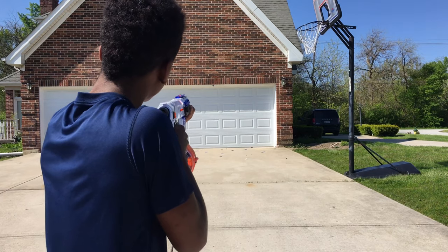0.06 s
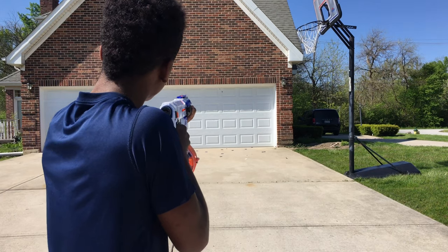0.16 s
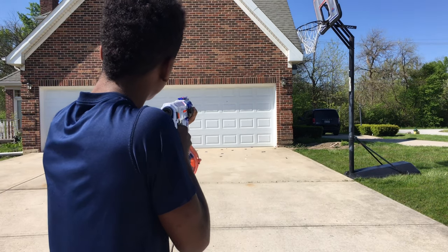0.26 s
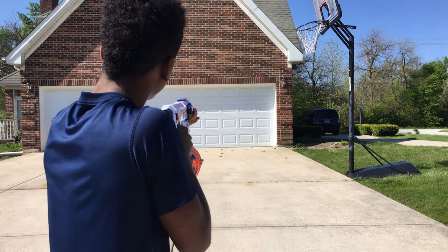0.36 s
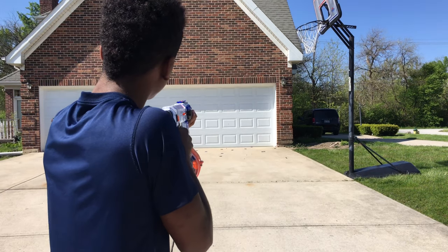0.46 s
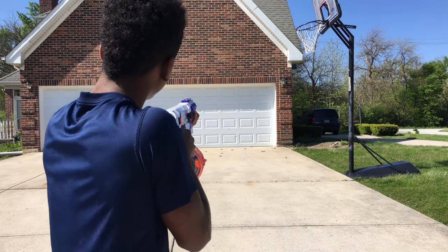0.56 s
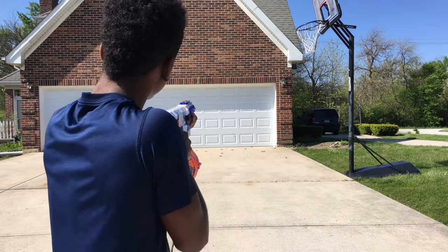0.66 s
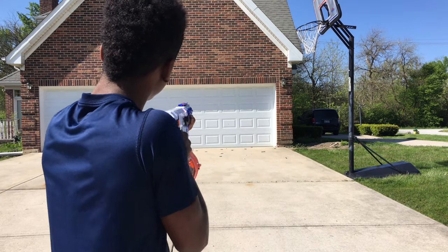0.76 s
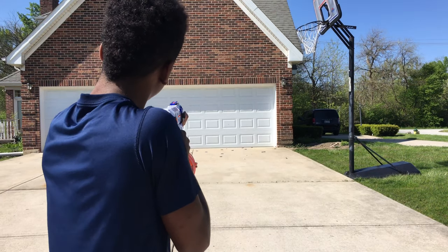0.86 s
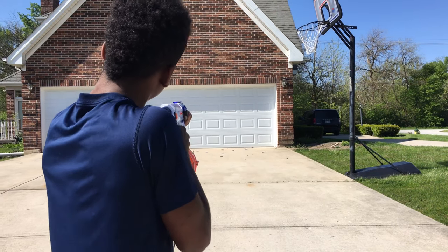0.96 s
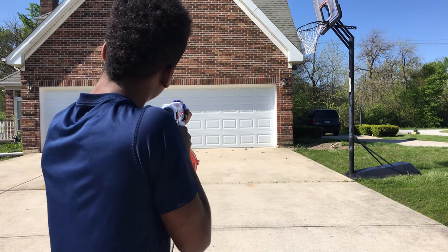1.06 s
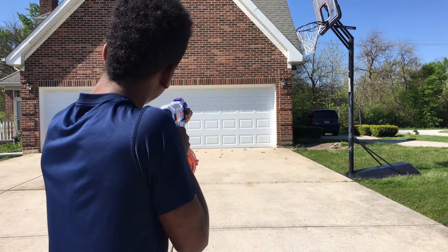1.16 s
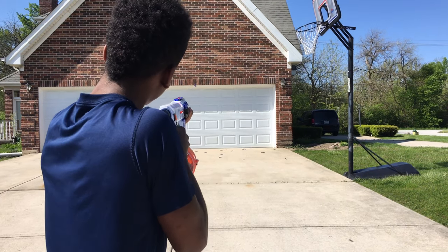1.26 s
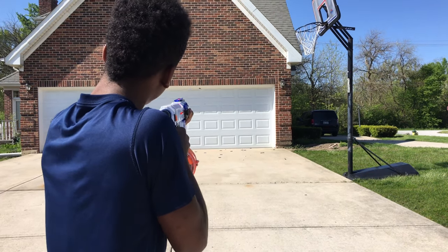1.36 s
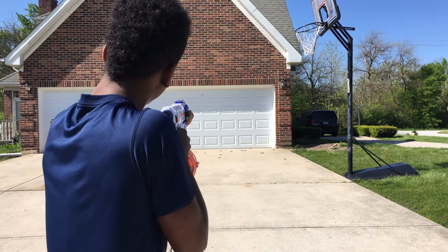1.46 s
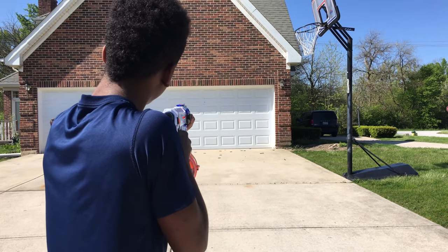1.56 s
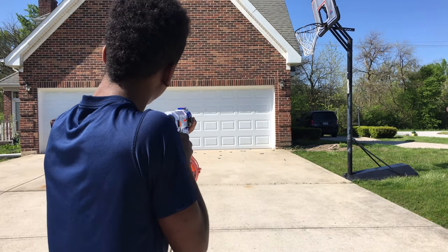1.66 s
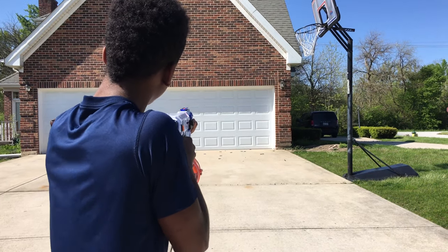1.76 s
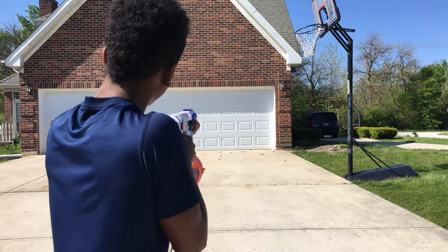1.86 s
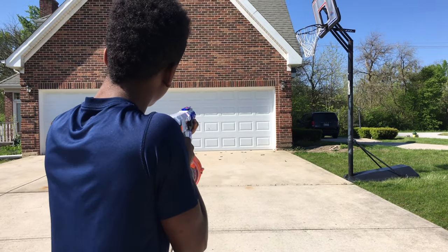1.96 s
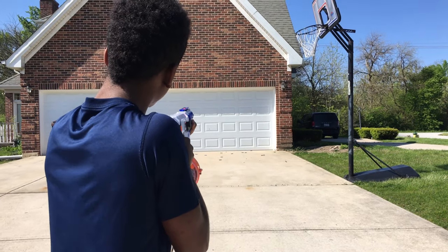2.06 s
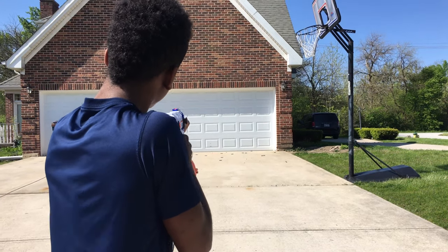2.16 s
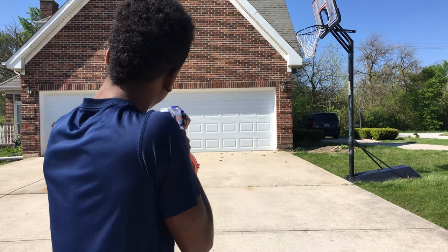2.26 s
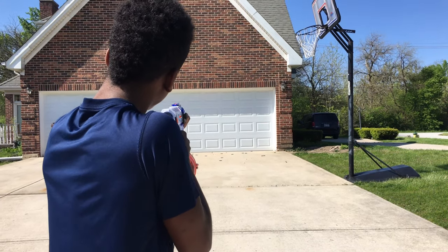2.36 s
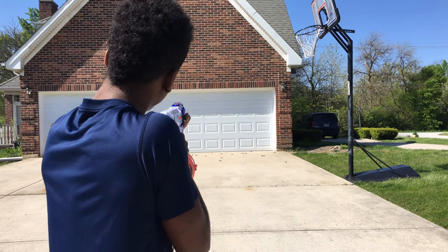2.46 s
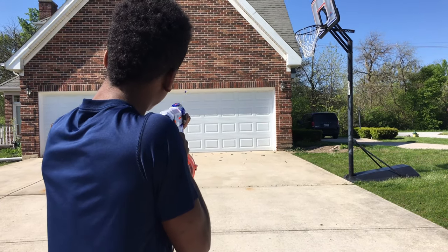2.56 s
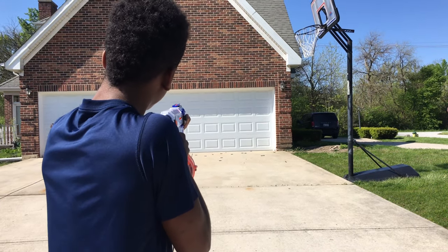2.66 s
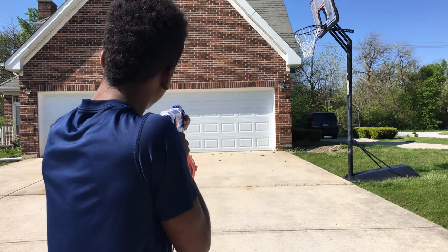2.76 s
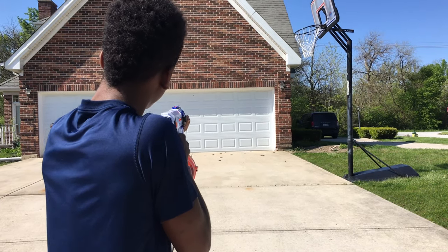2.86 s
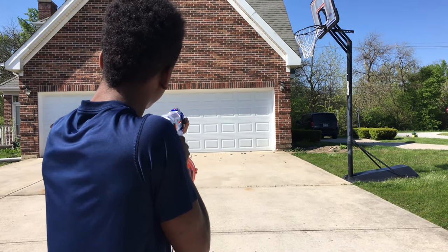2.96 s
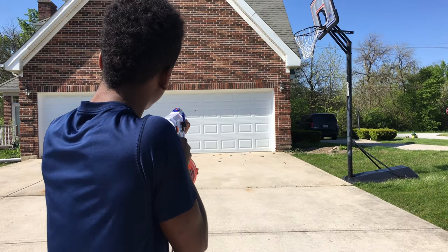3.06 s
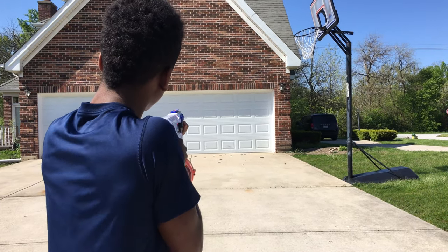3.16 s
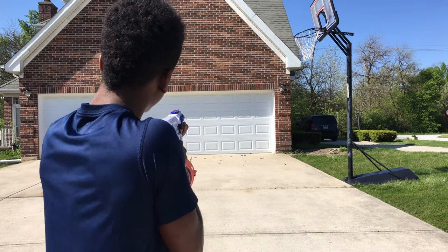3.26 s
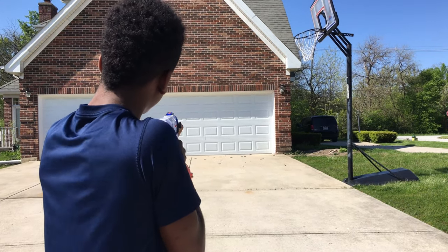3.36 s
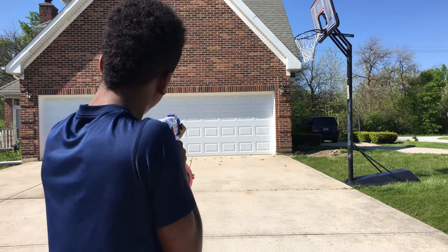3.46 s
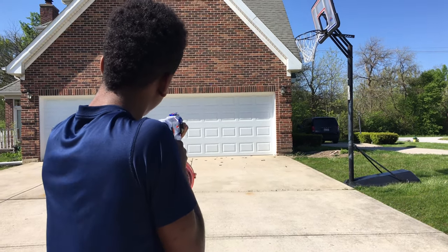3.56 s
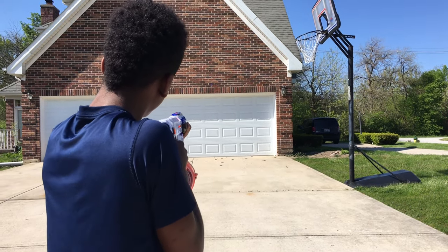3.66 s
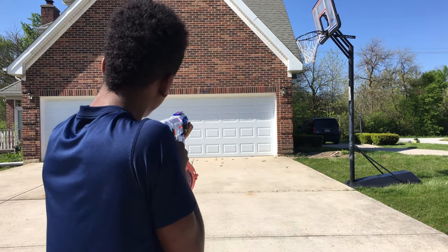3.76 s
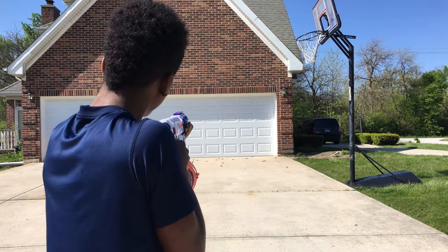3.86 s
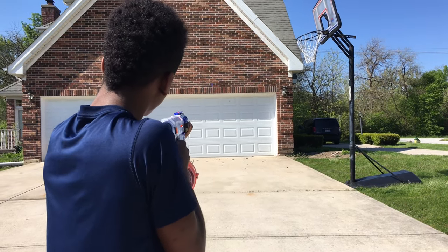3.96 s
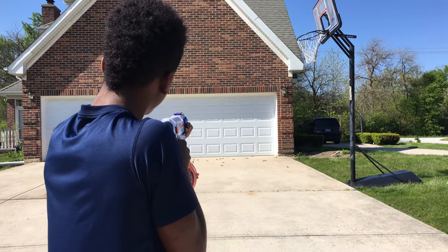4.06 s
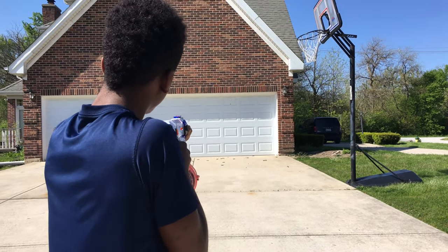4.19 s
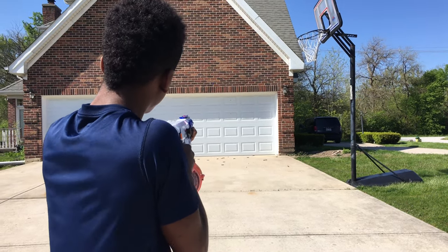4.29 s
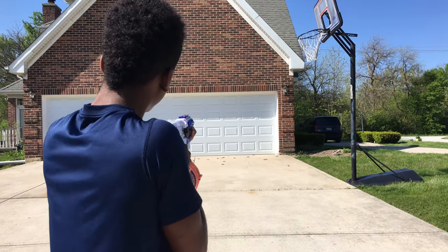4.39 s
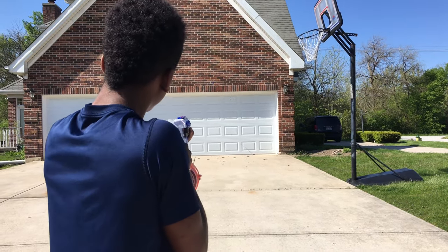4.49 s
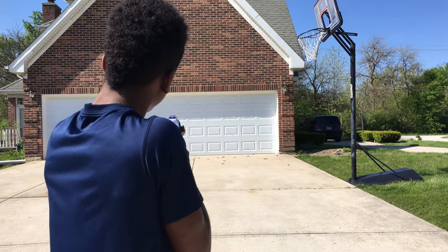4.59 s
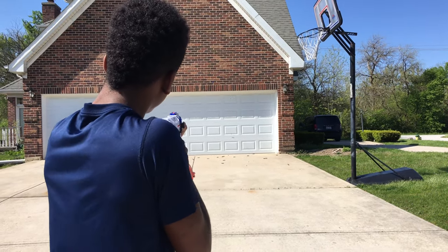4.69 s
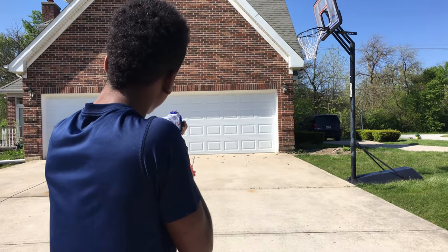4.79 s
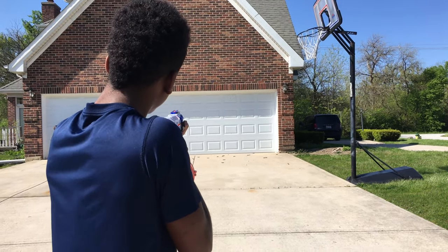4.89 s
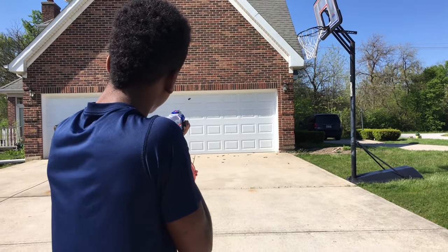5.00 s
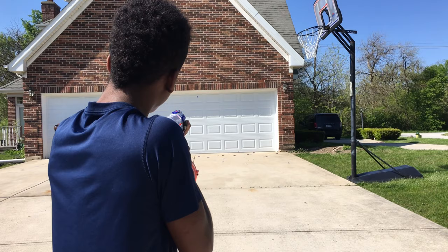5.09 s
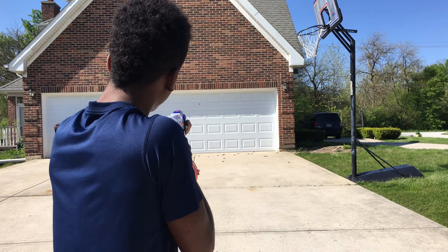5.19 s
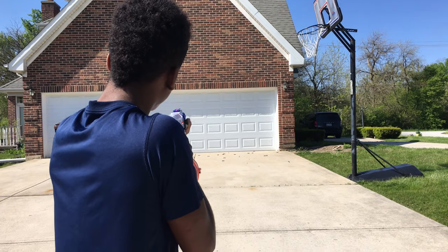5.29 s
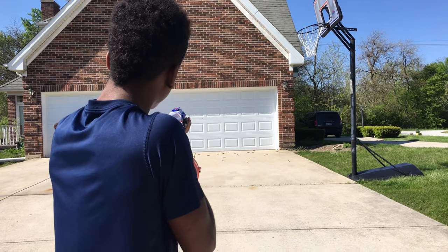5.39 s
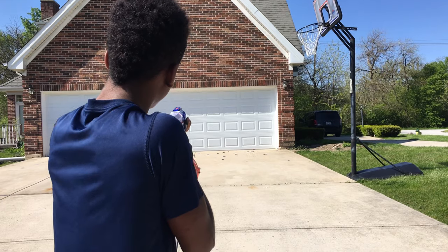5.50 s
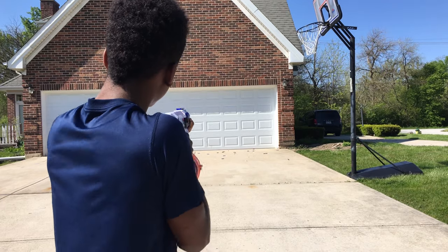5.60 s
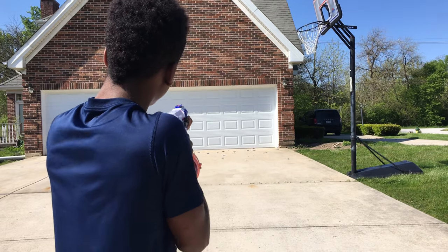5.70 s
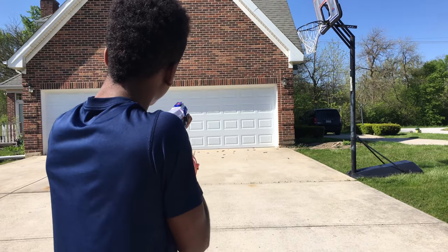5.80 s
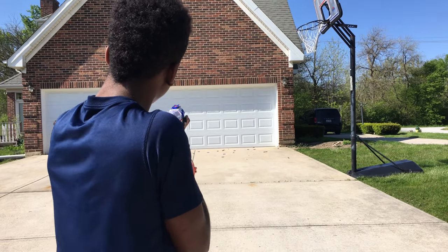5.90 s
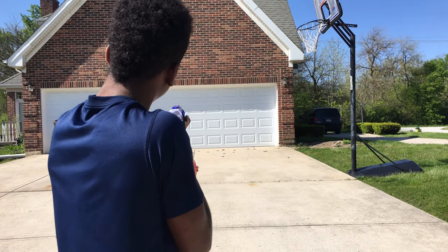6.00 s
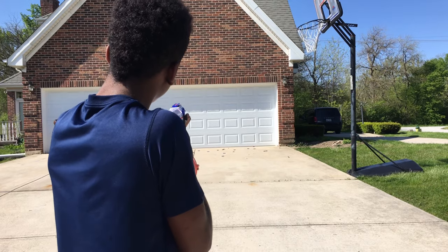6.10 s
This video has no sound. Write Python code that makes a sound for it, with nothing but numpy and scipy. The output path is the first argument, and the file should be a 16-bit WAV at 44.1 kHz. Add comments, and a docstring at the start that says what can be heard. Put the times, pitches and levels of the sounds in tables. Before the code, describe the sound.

A spring-powered plastic dart blaster is worked close to the microphone on an open driveway. The sound starts right on a shot at 0.0 seconds: a loud, dry piston slam with bright rebound and short hollow barrel pop. More shots follow near 1.26, 2.53, 3.79 and 5.0. After each, the grip scrapes and clacks back, at about 0.6, 1.85, 3.12, 4.35 and 5.6, with a latch, loose rattling and often a duller knock; it slams forward near 0.95, 2.23, 3.46, 4.69 and 5.94. A small trigger click comes just before each later shot. A faint garage slap returns about 0.07 seconds later. Soft foam darts tap down far off about 0.3 seconds after firing. A distant bird twitters faintly before 0.9. Low wind buffets in uneven puffs, strongest around 1.2 to 1.7, over a soft garden hush. It ends just after the final forward slam.

```python
"""Toy dart blaster on a driveway

A spring-powered toy dart blaster is pumped and fired just in front of the microphone. Each stroke layers
noise bursts through plastic resonances: grip rattling back and clacking home, trigger click, plunger slam.
Damped sines ring the barrel and stock; foam darts tap down far off as soft filtered bursts.
A garage front echoes it all; shaped noise makes the gusts and the garden hush, and fluttering sines a far bird.
"""
import sys
import numpy as np
from scipy import signal
from scipy.fft import rfft, irfft, next_fast_len
from scipy.io import wavfile
from scipy.ndimage import uniform_filter1d

SR = 44100
rng = np.random.default_rng(int(sys.argv[2]) if len(sys.argv) > 2 else 0)


def generate_wav(signal):
    """Clip the signal to [-1, 1] and save it as 16-bit WAV at the path in sys.argv[1]."""
    frames = np.transpose(np.atleast_2d(signal))
    scaled = np.clip(frames, -1, 1) * 32767
    pcm = np.round(scaled).astype(np.int16)
    wavfile.write(sys.argv[1], SR, pcm)


N = 270774

# Plunger releases: (time [s], mechanism trim [dB], muzzle pop trim [dB])
SHOTS = [(-.0125, -2, -1.5), (1.260, .5, 1), (2.532, 0.5, 0.5), (3.7872, -1, 3.5), (5.0053, 1, 0)]
# Air column of barrel and cylinder: (frequency [Hz], level [dB], t60 [s])
BARREL_MODES = [(148, -18.5, 0.024), (226, -21, 0.03), (368.3, -4, 0.038), (582, -3, 0.042),
                (790, -9, 0.045), (980, -6.5, 0.051), (1310, -12, 0.066), (1764, -13, 0.019)]
# Hollow stock: (frequency [Hz], level [dB], t60 [s])
STOCK_MODES = [(229, 1.5, 0.074), (423, -1, 0.078), (989, -3.5, 0.062), (1556, 4, 0.068)]

# Broad colours, scaled to unit power when used: (frequency [Hz], relative level per Hz [dB])
# of the plastic shell, piston slam, piston rebound, air behind the dart, trigger catch and dart taps
SHELL_COLOUR = [(120, -29), (200, -10), (394, -10), (519, -6), (986, -0.5), (1450, 2), (1740, -1.3),
                (2470, -3.3), (2960, -3), (3430, -4), (5420, -10), (9400, -14.5), (10500, -18),
                (11900, -16), (16000, -25.5)]
SLAM_COLOUR = [(150, -9.5), (400, 7), (900, 4), (1400, 1), (2000, -0.5), (2850, -3), (3400, -4.5),
               (4400, -0.5), (4950, -3.5), (5500, -4), (7500, -8.5), (10300, -12.5), (12300, -12.5),
               (16000, -38.5)]
REBOUND_COLOUR = [(200, -5), (800, 2), (2500, -9), (5500, -3), (9000, -2.5), (13000, -1), (16000, -11)]
AIR_COLOUR = [(50, -31.5), (150, -7.5), (400, -3), (900, -1.5), (1300, -5.5), (2200, -24.5), (6000, -34.5)]
CATCH_COLOUR = [(200, -21.5), (550, -12), (800, -2), (1700, -2), (3500, -5), (5000, -8.5), (8500, -11),
                (10400, -17.5), (12000, -14.5), (16000, -23)]
DART_COLOUR = [(200, -66), (500, 2), (900, 8), (1500, 0.5), (3000, -3.5), (6000, -15), (10000, -29),
               (16000, -29)]
# of the quiet garden, the wind, and the tail scattered by trees, in the same columns
GARDEN_COLOUR = [(15, -33), (25, -6), (64, 5.5), (127, -5), (270, -14.5), (384, -11.5), (503, -16.5),
                 (840, -15), (1020, -15.5), (1700, -20.5), (3620, -26), (7710, -35.5), (11900, -38.5),
                 (14800, -41.5), (16000, -54.5)]
WIND_COLOUR = [(15, -39), (25, -9), (70, 0), (179, -4.5), (279, -11.5), (325, -17), (395, -22),
               (700, -30.5), (910, -70.5), (1540, -120)]
TREE_COLOUR = [(150, -4.5), (500, -4.5), (1100, 11.5), (3500, -12.5), (7000, 6.5), (16000, -15.5)]

# Resonances of shell, cylinder and catch: (frequency [Hz], width [Hz], boost [dB])
SHELL_MODES = [(379, 56, 7.5), (489, 35, -10), (815, 60, 3.5), (985, 110, 3.2), (1067, 21, -6),
               (1303, 75, 2), (1408, 260, -0.5), (1526, 65, 1.5), (2080, 120, 4), (2400, 35, 7),
               (2940, 330, -7), (3400, 490, 3), (4051, 450, 2.7), (4480, 210, 3), (5550, 110, 2),
               (5420, 480, 4), (5980, 400, 0.8), (6200, 540, 3.5), (6790, 470, 3.5), (7300, 400, -1),
               (8300, 260, 3), (9500, 290, 3), (10200, 260, -2), (11450, 220, 2.5)]
CYLINDER_MODES = [(1445, 87, -10), (1824, 47, 4), (2906, 440, -7.5), (3110, 77, 5.5), (3390, 790, 9.5),
                  (3670, 110, 1.5), (4135, 440, 1), (5000, 240, -6.5), (5400, 400, 6.5), (5941, 540, 3.5),
                  (6160, 190, 1), (6800, 400, 3), (8000, 90, 0), (8400, 250, 2.5), (10433, 470, -8),
                  (11100, 240, 0)]
CATCH_MODES = [(766, 58, 5.7), (1015, 63, 6.3), (2067, 200, 9.9), (2550, 72, 8), (3459, 400, 5.6),
               (4100, 260, 10), (4560, 90, 6.9), (6170, 280, 8), (7300, 320, 5.5), (8645, 400, 6)]

# Strength of the breeze, before the breeze gain: (time [s], level [dB])
GUSTS = [(0.0, -47), (0.2, -46), (1.04, -39), (1.39, -27), (1.52, -27), (1.76, -40), (1.98, -43.5),
         (2.21, -40.5), (2.74, -46), (3.15, -40), (3.47, -48), (4.14, -49), (4.5, -49), (4.84, -37.5),
         (5.06, -44), (5.52, -42), (5.66, -47), (6.14, -52)]
# Strongest eddies hitting the microphone: (time [s], level [dB])
PUFFS = [(.68, -27), (.733, -21), (1.022, -26), (1.185, -20), (1.323, -21), (1.615, -23), (1.71, -27),
         (2.364, -25), (2.881, -25), (3.02, -28.5), (3.074, -28), (3.253, -29), (4.593, -25),
         (4.843, -21.5), (4.877, -21), (5.255, -30), (5.511, -32)]
# Far songbird's twittering phrases: (start [s], end [s], reference pitch [Hz], level [dB])
PHRASES = [(.09, 0.426, 5300, -56), (.44, .57, 4950, -58), (.72, .86, 5100, -58.5)]
# Bird's two voices: (share of the reference pitch, level trim [dB])
VOICES = [(0.97, 1.5), (.55, -1.5)]
# Hollow echoes from the ribbed garage door: (delay [s], level [dB])
DOOR_ECHOES = [(0.0748, -15.5), (0.1, -26.5)]

# Darts landing far off: (time [s], level before the common trim [dB])
DARTS = [(.243, -19.5), (1.551, -22), (2.8, -20), (4.073, -23), (5.323, -27.5)]
# Each dart grazes, hits, tumbles and taps again: (time from the hit [s], level trim [dB])
DART_TAPS = [(-.012, -2), (0, 0), (.028, -9.5), (.046, 0)]
# Single light taps around the dart landings: (time [s], level before the common trim [dB])
SINGLE_TAPS = [(.388, -29), (4.0, -30), (5.219, -29), (5.273, -30.5)]

# Grip pulled back, timed at its sharpest crack:
# (time [s], trim [dB], duration as a share of the usual, spring latching level [dB])
PULLS = [(0.597, .7, 1.0, -11.5), (1.8491, .3, 1.03, -14), (3.1239, -.7, 1.1, -10.5), (4.3501, .3, .96, -7),
         (5.5982, -.7, .98, -11.5)]
# Pull contacts: grip taken up, two catches, the crack, a rail joint, the spring's catch:
# (time from the crack [s], level [dB], treble trim [dB])
PULL_CONTACTS = [(-.034, -37, 0.5), (-.0135, -22.5, 8), (-.0058, -17, 9.5), (0, -17.5, 18),
                 (.021, -21.5, 13.5), (.033, -16, 11.5)]
# Grip sliding back: (start from the crack [s], end [s], start level [dB], end level [dB])
PULL_SLIDE = (-.021, .046, -21, -17.5)
# Grip knocking its rear stop: (time [s], level [dB], treble trim [dB])
REAR_KNOCKS = [(.678, -9.5, -10), (1.9094, -14.5, -20), (1.9394, -12, 2.5), (3.1824, -6.5, -24),
               (5.6894, -8, -22)]
# Each knock and its duller rebound: (time after the knock [s], level trim [dB], treble trim [dB])
KNOCK_CONTACTS = [(0, 0, 0), (.009, -7.5, -11.5)]
# Grip slammed home: (time [s], trim [dB], duration as a share of the usual, jolt of the stock [dB])
PUSHES = [(.9454, .5, 1.07, -22.5), (2.2303, 0, .94, -23.5), (3.4616, -.3, 1.06, -23.5),
          (4.6868, .3, .96, -18), (5.937, 1, 1.0, -19)]
# Push contacts: grip taken up, dart picked up, two catches, breech shutting twice, rebound:
# (time from the slam [s], level [dB], treble trim [dB])
PUSH_CONTACTS = [(-.067, -31, 1), (-.037, -17, -14.5), (-.0135, -21.5, 5), (-.0075, -17, 7.5),
                 (0, -8.8, 6.5), (.003, -16, 10), (.027, -17.5, -18)]
# Grip sliding forward: (start from the slam [s], end [s], start level [dB], end level [dB])
PUSH_SLIDE = (-0.06, -0.0031, -30, -19.5)
# Trigger pulls: (time of the snap [s], snap level [dB], level of the slack taken up [dB])
TRIGGERS = [(1.2225, -12, -16), (2.491, -13.5, -16), (3.7528, -12, -21), (4.9695, -14, -24)]

LATCH_AFTER_S, LATCH_TREBLE_DB = .0395, 2   # crack to latch at the usual pull duration
JOLT_LEAD_S = .0015   # the stock is jolted just before the breech shuts
RATTLE_DB, RATTLE_TREBLE_DB, RATTLE_FALL_DB_PER_S = -22, -20, 150
RATTLE_GAP_S = .015   # mean gap between bounces of loose parts
DRAG_DB, DRAG_HZ = 2.5, 500   # hollow drag of the forward slide, and its lowpass
SLACK_LEAD_S, SLACK_TREBLE_DB, SNAP_TREBLE_DB = .011, -11.5, 5.5
BREEZE_DB, CALM_DB = 5, -46.5   # buffeting gain; gusts below the calm level add no buffeting
GARDEN_DB = -46   # before the gains inside and outside the dull spans
DULL_FROM_S, DULL_S = 0.426, 0.14   # spans of quieter, duller background: start counted from a shot, length
SLURS_PER_S, SLUR_DEPTH = 24, .022   # depth as a share of the pitch
CUTOFF_HZ = 16100

SIZE = next_fast_len(N + SR)   # spare second for tails and for sound begun before time zero
HZ = np.maximum(np.arange(SIZE // 2 + 1) * SR / SIZE, 1)
TIME = np.arange(SIZE) / SR
AGE = np.arange(SR // 4) / SR   # seconds since the start of one short sound


def from_db(db):
    """Turns decibels into amplitude gain."""
    return 10 ** (np.asarray(db) / 20)


def fade(t, t60):
    """Dies by 60 dB in t60 seconds; silent before time zero."""
    return (t >= 0) * np.exp(-np.log(1000) * np.maximum(t, 0) / t60)


def add(track, s, sound):
    """Mixes a sound in at s seconds; the track wraps round at its ends."""
    track[(round(s * SR) + np.arange(len(sound))) % SIZE] += sound


def lowpass(x, hz, order=2):
    """Butterworth rolloff of the treble."""
    sos = signal.butter(order, min(hz, .45 * SR), fs=SR, output="sos")
    return signal.sosfilt(sos, x + 1e-18)


def colour(x, spectrum, modes=()):
    """Causal (minimum-phase) filter of unit power: a broad spectrum with resonances on top."""
    hz, db = np.transpose(spectrum)
    db = np.interp(np.log(HZ), np.log(hz), db)
    for centre, width, peak_db in modes:
        db = db + peak_db / (1 + (2 * (HZ - centre) / width) ** 2)
    gain = from_db(db)
    unit_gain = gain / np.sqrt(np.mean(gain ** 2))
    # folding the cepstrum onto positive time gives minimum phase
    cepstrum = irfft(np.log(unit_gain), SIZE)
    cepstrum[1:] *= 2 * (np.arange(1, SIZE) < SIZE // 2)
    return irfft(rfft(x, SIZE) * np.exp(rfft(cepstrum)), SIZE)


def drift(rate):
    """Random wander about zero with rate knots per second; spread about 1."""
    knots = rng.standard_normal(SR // 10)
    return np.interp(TIME * rate, np.arange(len(knots)), knots)


def chatter(spread_db, count=len(AGE)):
    """Dense tiny contacts of uneven size; rms 1."""
    noise = rng.standard_normal(count)
    sizes = np.repeat(rng.standard_normal(count // 16 + 1), 16)[:count]
    x = noise * from_db(abs(spread_db) * sizes)
    return x / x.std()


def ring(modes):
    """Damped sines pushed off together that swell up quickly; every stroke is tuned a little differently."""
    out = 0
    for hz, db, t60 in modes:
        detune, phase = rng.normal(0, 0.017), rng.normal(0, 0.46)
        sine = np.sin(2 * np.pi * hz * (1 + detune) * AGE + phase)
        out = out + from_db(db) * fade(AGE, t60) * sine
    return out * (1 - fade(AGE, 0.0052))


def blows(rows, t60, tail_db, tail_t60, rise, split_hz):
    """Each blow builds in about a millisecond, then crowded plastic modes die away; the treble dies first."""
    body, treble = np.zeros((2, SIZE))
    for s, db, treble_db in rows:
        ringing = chatter(spread_db=1.0) * (1 - fade(AGE, rise))
        decay = fade(AGE, t60) + from_db(tail_db) * fade(AGE, tail_t60)
        add(body, s, from_db(db) * ringing * decay)
        add(treble, s, from_db(db + treble_db) * ringing * fade(AGE, t60 * 0.86))
    # body below the split, treble above it
    return lowpass(body - treble, split_hz, order=1) + treble


def plunger():
    """The spring rushes, the piston slams and rebounds with a bright snap; a puff of air rings the barrel."""
    crash, snap, air, pop = np.zeros((4, SIZE))
    for s, db, pop_db in SHOTS:
        rush = from_db(-13.0) * fade(AGE, 0.13)
        since_slam = AGE - .004
        slam = from_db(-2.5) * fade(since_slam, 0.067) * (1 - fade(since_slam, 0.0086))
        puff = np.exp(-((AGE - .0105) / 0.0043) ** 2)
        add(crash, s, from_db(db) * np.hypot(rush, slam) * chatter(spread_db=1.5))
        add(snap, s + .0145, from_db(db - 7.0) * fade(AGE, 0.045) * chatter(spread_db=3.5))
        add(air, s, from_db(pop_db - 6) * puff * chatter(spread_db=0.5))
        add(pop, s + 0.006512, from_db(pop_db + 2) * ring(BARREL_MODES))
    mechanism = colour(crash, SLAM_COLOUR, CYLINDER_MODES) + colour(snap, REBOUND_COLOUR, CYLINDER_MODES)
    muzzle = pop + colour(air, AIR_COLOUR)
    return mechanism, muzzle


def wind():
    """Lumpy buffeting at the microphone; stronger gusts reach higher up."""
    breeze = from_db(np.interp(TIME, *np.transpose(GUSTS)))
    gust = from_db(BREEZE_DB) * np.maximum(breeze - from_db(CALM_DB), 0)
    eddies = colour(rng.standard_normal(SIZE), WIND_COLOUR)
    eddies /= np.sqrt(uniform_filter1d(eddies ** 2, size=1500) + 1e-6)   # even out their loudness
    puffs = np.zeros(SIZE)
    middle = AGE.mean()
    for s, db in PUFFS:
        add(puffs, s - middle, from_db(db) * np.exp(-((AGE - middle) / 0.017) ** 2))
    strength = np.hypot(gust * from_db(2.55 * drift(35)), puffs)
    slow = lowpass(eddies, 170)
    treble_share = np.clip(strength / from_db(-24.5), 0, 1)
    return strength * (slow + treble_share * (eddies - slow))


def garden():
    """Leaves and far traffic make a soft, wavering hush."""
    hush = from_db(GARDEN_DB + .8 * drift(13)) * colour(rng.standard_normal(SIZE), GARDEN_COLOUR)
    # short spans where the background is quieter and duller
    dull_share = 0
    for s, *_ in SHOTS:
        start = s + DULL_FROM_S
        dull_share = dull_share + np.heaviside(TIME - start, 0) * (TIME < start + DULL_S)
    dull_share = uniform_filter1d(dull_share, size=600)   # soften the edges
    dull = from_db(-3) * lowpass(hush, 3500, order=1) + from_db(-12.5) * hush
    return (1 - dull_share) * from_db(2.5) * hush + dull_share * dull


def driveway(clatter, muzzle):
    """The muzzle faces the garage, so its pop echoes most; door ribs return one pitch, trees a faint tail."""
    wall, door = np.zeros((2, SIZE))
    add(wall, .0738, from_db(-35.5) * chatter(spread_db=1.0) * fade(AGE, 0.056))
    add(wall, .0738, [1])
    for delay, db in DOOR_ECHOES:
        add(door, delay, [from_db(db)])
    ribs = signal.lfilter(*signal.iirpeak(1010, 5, fs=SR), clatter)
    sent = from_db(-18.5) * muzzle + from_db(-24.5) * lowpass(clatter, 4500, order=1)
    scatter = rng.standard_normal(SIZE) * fade(TIME, 0.57) * (1 - fade(TIME, 0.13))
    scatter = colour(scatter / np.linalg.norm(scatter), TREE_COLOUR)
    tail = from_db(-43.5) * rfft(clatter + muzzle) * rfft(scatter)
    return irfft(rfft(sent) * rfft(wall) + rfft(ribs) * rfft(door) + tail, SIZE)


def bird():
    """Quick fluttering slurs around one pitch in each voice, blurred by the trees."""
    song = np.zeros(SIZE)
    for start, end, hz, db in PHRASES:
        count = max(round((end - start) * SR), 2)
        slurs = SLUR_DEPTH * np.sin(2 * np.pi * SLURS_PER_S * TIME[:count])
        for share, voice_db in VOICES:
            flutter = .012 * drift(60)[:count] + .042 * drift(830)[:count]
            pitch = hz * share * (1 + slurs + flutter)
            level = from_db(db + voice_db + 3 * drift(74)[:count]) * signal.windows.tukey(count, .2)
            add(song, start, level * np.sin(2 * np.pi * np.cumsum(pitch) / SR))
    blur = rng.standard_normal(len(AGE)) * fade(AGE, .09)
    return signal.fftconvolve(song, blur / np.linalg.norm(blur))[:SIZE]


def darts():
    """Soft foam darts tap down far away, each tap a dull burst of tiny contacts."""
    taps = np.zeros(SIZE)
    landings = [(s + lag, db + tap_db) for s, db in DARTS for lag, tap_db in DART_TAPS]
    for s, db in landings + SINGLE_TAPS:
        add(taps, s, from_db(db - 9.5) * chatter(spread_db=3.5) * fade(AGE, 0.068))
    return colour(taps, DART_COLOUR)


def contacts(pattern, s, db, treble_db=0, stretch=1):
    """One run of the mechanism's contacts as blows: (time [s], level [dB], treble trim [dB])."""
    return [(s + stretch * lag, db + level, treble_db + treble) for lag, level, treble in pattern]


def rattle(s, count):
    """Loose parts bounce unevenly, tending fainter: (time [s], level [dB], treble trim [dB])."""
    lags = np.cumsum(RATTLE_GAP_S * rng.uniform(.4, 1.6, count))
    return [(s + lag, RATTLE_DB - RATTLE_FALL_DB_PER_S * lag + rng.normal(0, 2), RATTLE_TREBLE_DB)
            for lag in lags]


def slide(shape, s, db, stretch=1):
    """Friction sets in quickly, grows along the rails and dies as the grip stops."""
    start, end, start_db, end_db = shape
    start, end = s + stretch * start, s + stretch * end
    times = [start - .006, start, end, end + 0.02]
    levels = np.interp(TIME, times, [-60, start_db, end_db, -50], left=-120, right=-120)
    return from_db(db + levels)


def judder(per_s, t60):
    """Plastic sticks and slips: each slip is a small burst that dies away; an envelope of rms 1."""
    slips = (rng.random(SIZE) < per_s / SR) * from_db(rng.normal(0, 3.7, SIZE))
    power = np.abs(signal.fftconvolve(slips, fade(AGE, t60) ** 2)[:SIZE])
    return np.sqrt(power / power.mean())


def pump():
    """The grip scrapes its rails and knocks catches and stops through the shell; slamming jolts the stock."""
    back, forward, thuds = np.zeros((3, SIZE))
    hits = []
    for s, db, stretch, latch_db in PULLS:
        latch = s + stretch * LATCH_AFTER_S
        hits += contacts(PULL_CONTACTS, s, db, stretch=stretch)
        hits += [(latch, latch_db, LATCH_TREBLE_DB)] + rattle(latch, count=7)
        back += slide(PULL_SLIDE, s, db, stretch)
    for s, db, treble_db in REAR_KNOCKS:
        hits += contacts(KNOCK_CONTACTS, s, db, treble_db)
    for s, db, stretch, jolt_db in PUSHES:
        hits += contacts(PUSH_CONTACTS, s, db, stretch=stretch) + rattle(s, count=2)
        forward += slide(PUSH_SLIDE, s, db, stretch)
        add(thuds, s - JOLT_LEAD_S, from_db(jolt_db) * ring(STOCK_MODES))
    grit = chatter(spread_db=2.0, count=SIZE) * judder(per_s=450, t60=0.031)
    scrape = from_db(-4.5) * (back + forward) * grit
    drag = from_db(DRAG_DB) * lowpass(forward * chatter(spread_db=3.0, count=SIZE), DRAG_HZ)
    knocks = blows(hits, t60=.040, tail_db=-19.5, tail_t60=0.27, rise=0.0033, split_hz=1690)
    return colour(knocks + scrape + drag, SHELL_COLOUR, SHELL_MODES) + thuds


def trigger():
    """The trigger takes up its slack, then the small catch snaps over and rings."""
    hits = []
    for s, db, slack_db in TRIGGERS:
        hits += [(s - SLACK_LEAD_S, slack_db, SLACK_TREBLE_DB), (s, db, SNAP_TREBLE_DB)]
    clicks = blows(hits, t60=0.034, tail_db=-18, tail_t60=0.11, rise=0.0052, split_hz=1860)
    return from_db(2.0) * colour(clicks, CATCH_COLOUR, CATCH_MODES)


def scene():
    """Mixes the blaster and its echoes with the darts, wind, garden and bird."""
    crash, pop = plunger()
    clatter = pump() + trigger() + crash
    blaster = clatter + pop + driveway(clatter, pop)
    return (blaster + darts() + wind() + garden() + bird())[None, :N]


def record(dry):
    """The microphone sheds the deepest rumble and overloads on the loudest blows; the top is cut."""
    heard = signal.sosfilt(signal.butter(3, 30, "high", fs=SR, output="sos"), dry)
    clipped = heard / (1 + heard ** 8) ** (1 / 8)
    return signal.sosfilt(signal.ellip(10, .2, 70, CUTOFF_HZ, fs=SR, output="sos"), clipped)


dry = scene()
out = record(dry)
generate_wav(out)
```